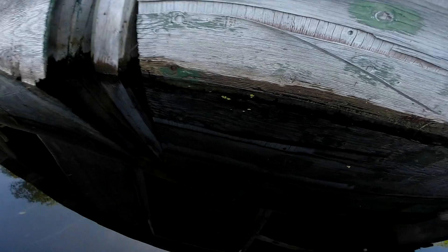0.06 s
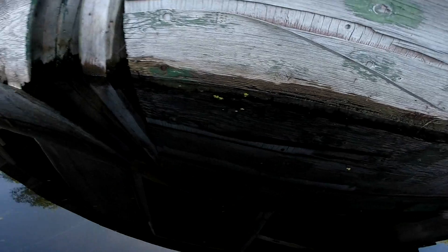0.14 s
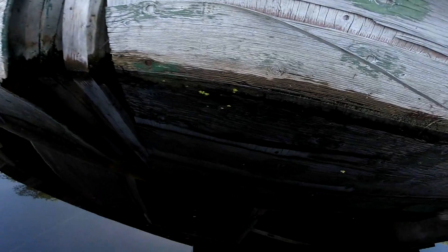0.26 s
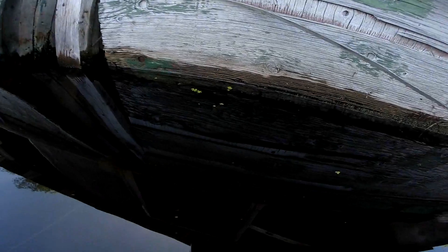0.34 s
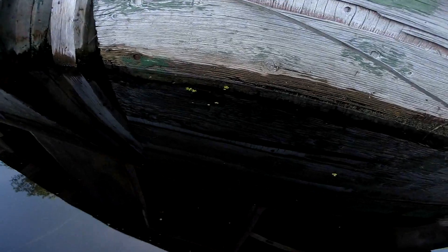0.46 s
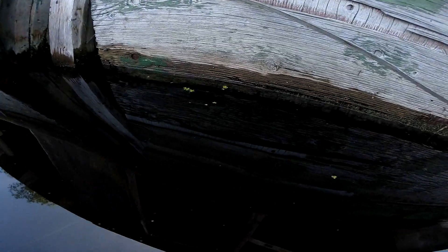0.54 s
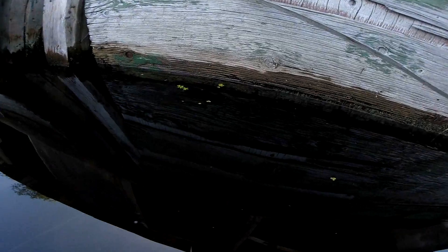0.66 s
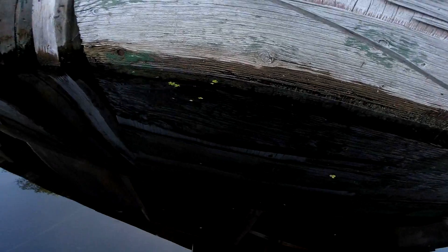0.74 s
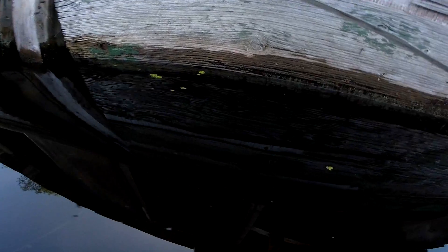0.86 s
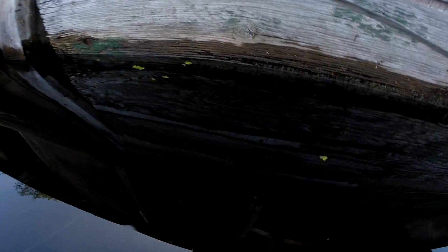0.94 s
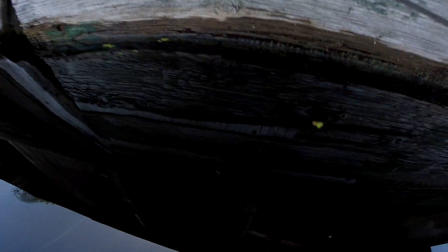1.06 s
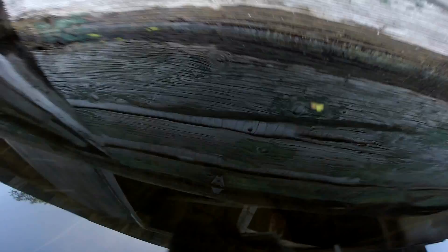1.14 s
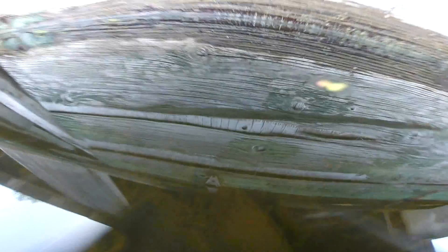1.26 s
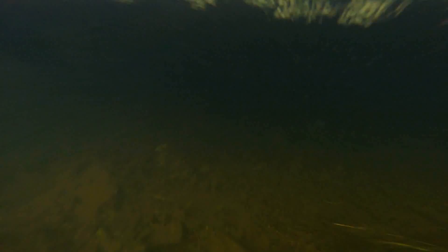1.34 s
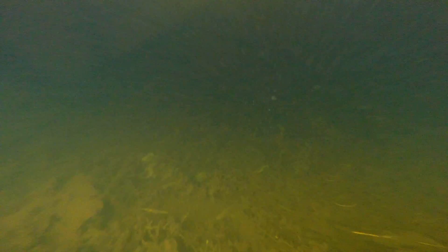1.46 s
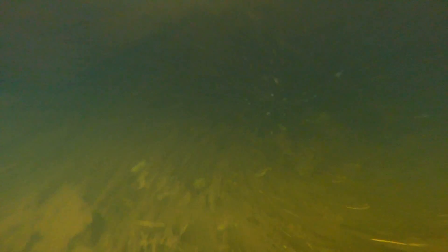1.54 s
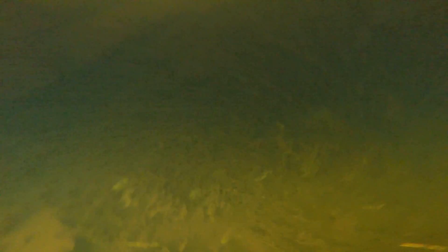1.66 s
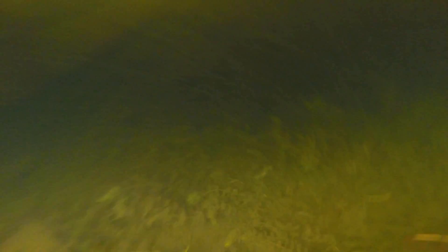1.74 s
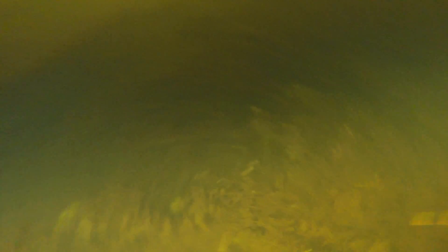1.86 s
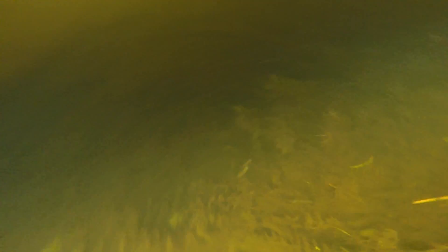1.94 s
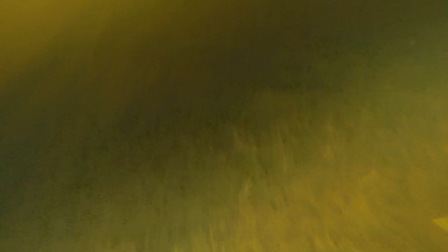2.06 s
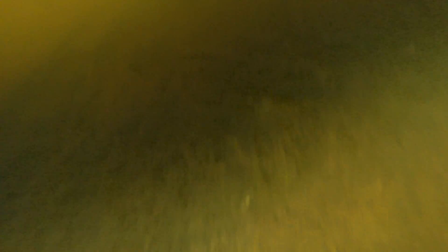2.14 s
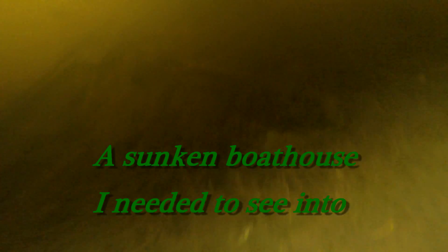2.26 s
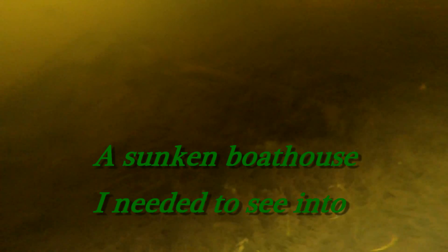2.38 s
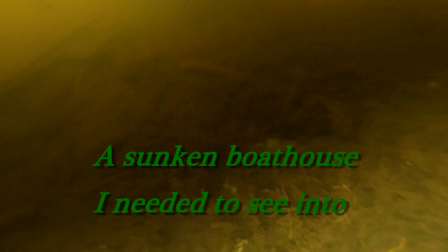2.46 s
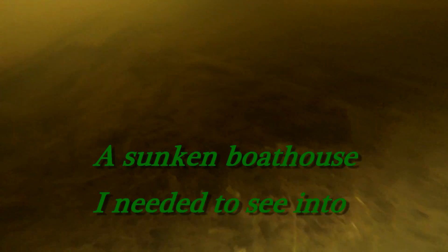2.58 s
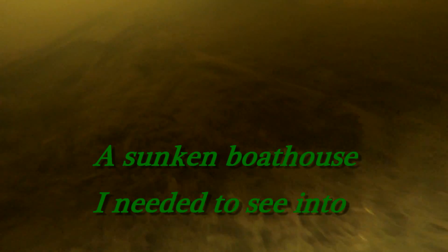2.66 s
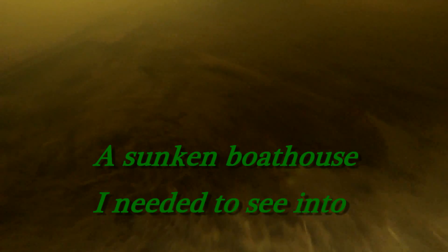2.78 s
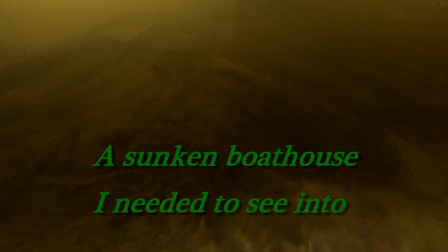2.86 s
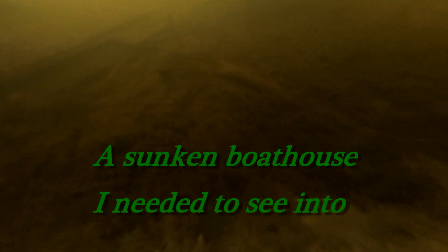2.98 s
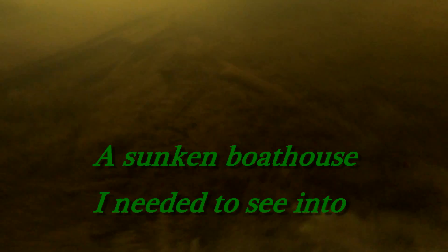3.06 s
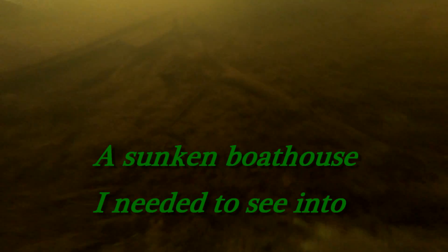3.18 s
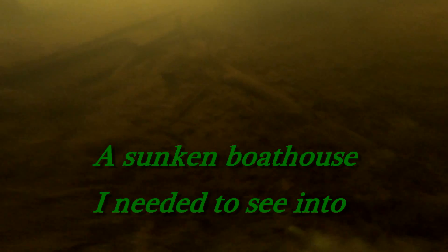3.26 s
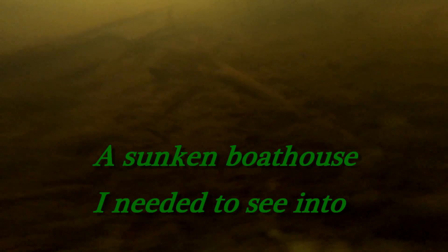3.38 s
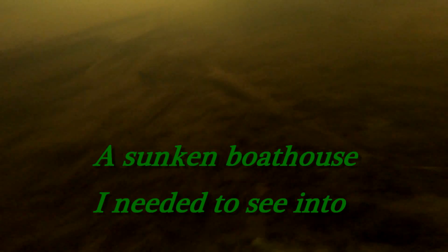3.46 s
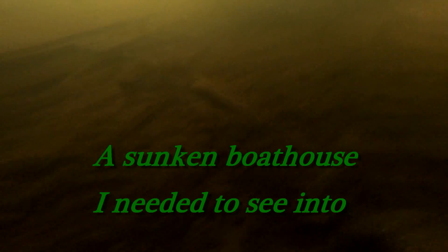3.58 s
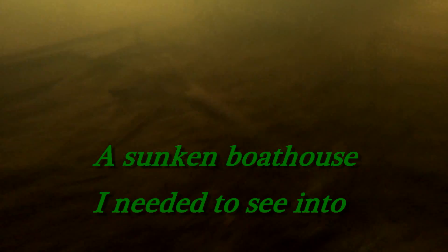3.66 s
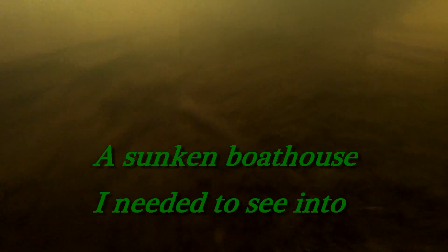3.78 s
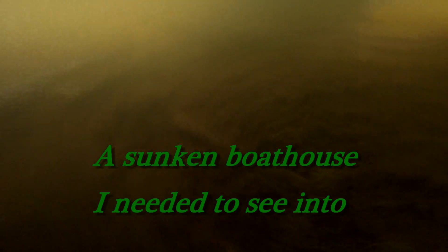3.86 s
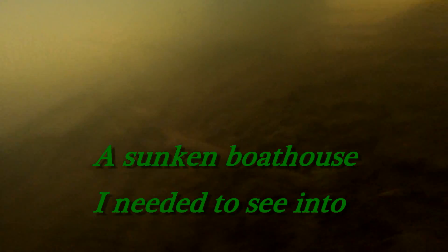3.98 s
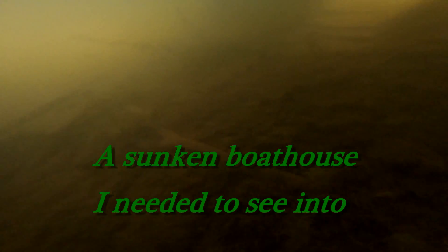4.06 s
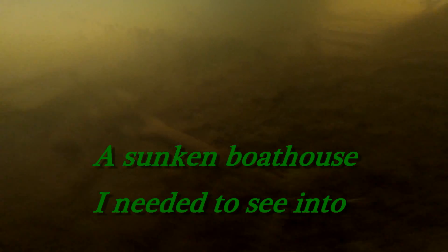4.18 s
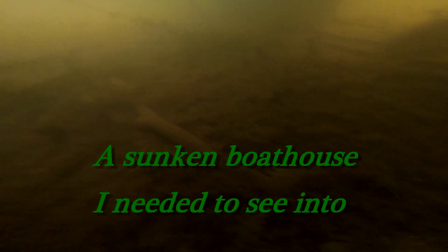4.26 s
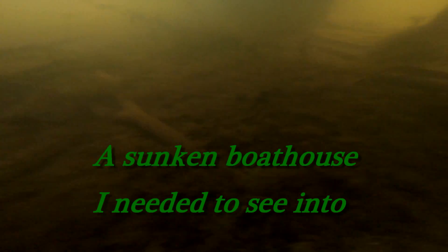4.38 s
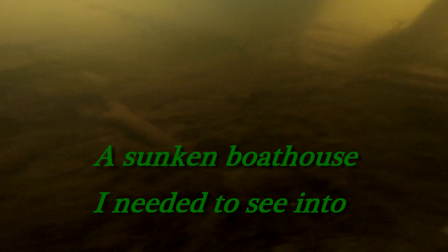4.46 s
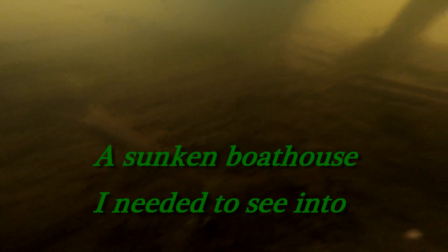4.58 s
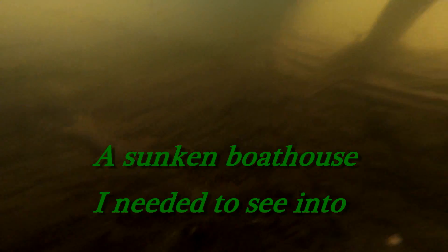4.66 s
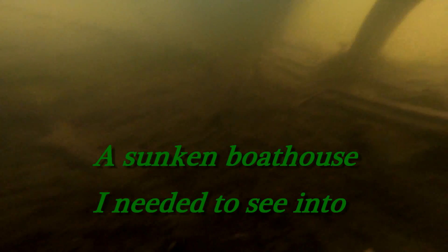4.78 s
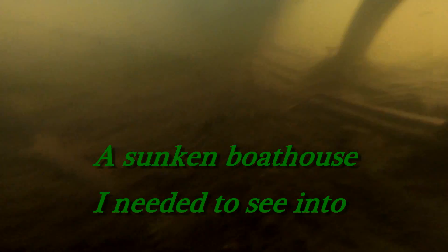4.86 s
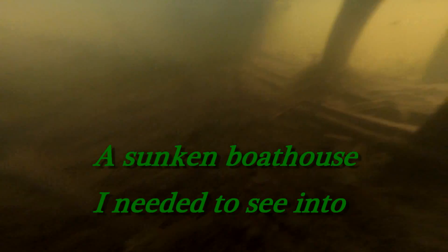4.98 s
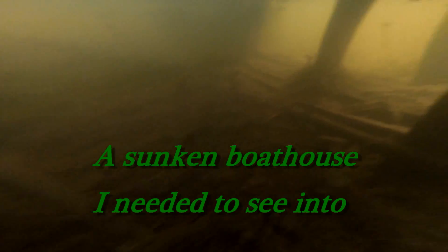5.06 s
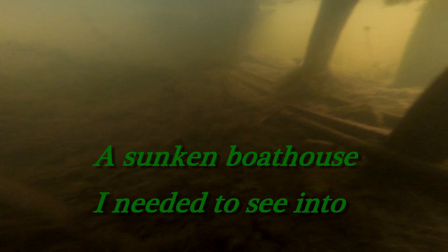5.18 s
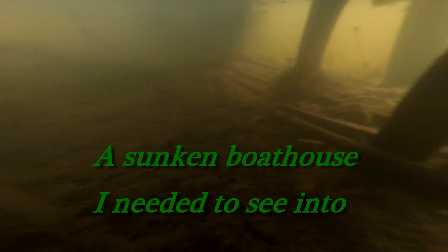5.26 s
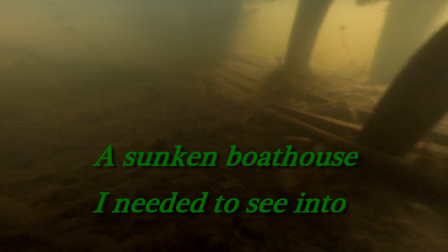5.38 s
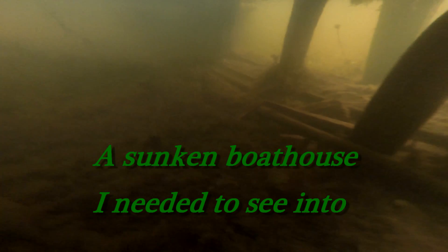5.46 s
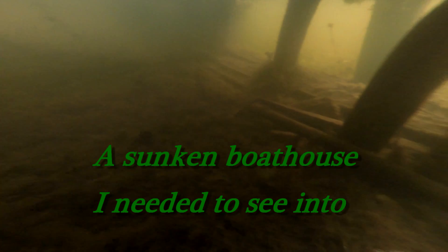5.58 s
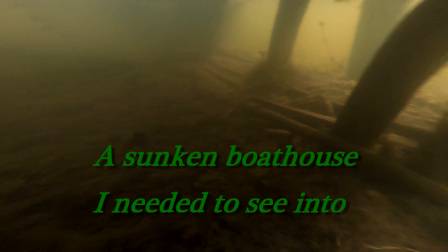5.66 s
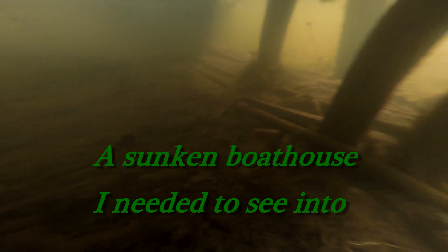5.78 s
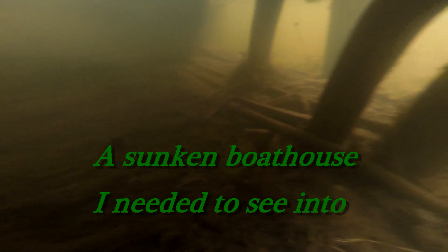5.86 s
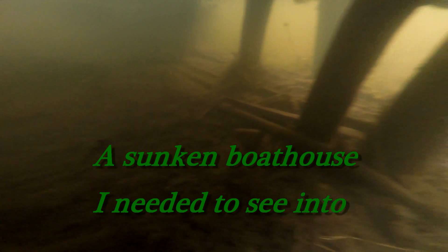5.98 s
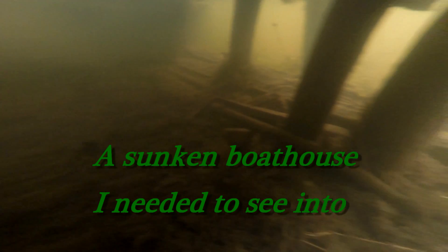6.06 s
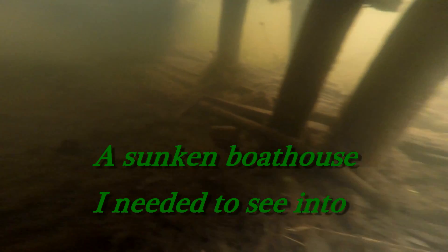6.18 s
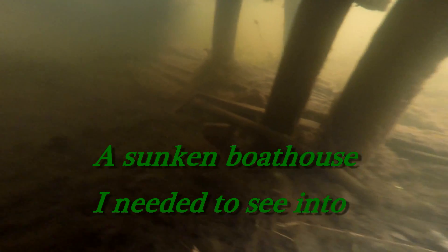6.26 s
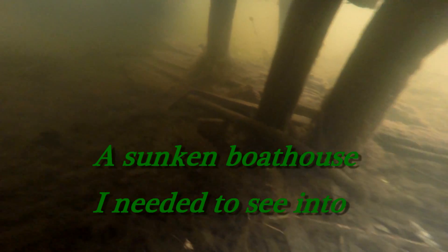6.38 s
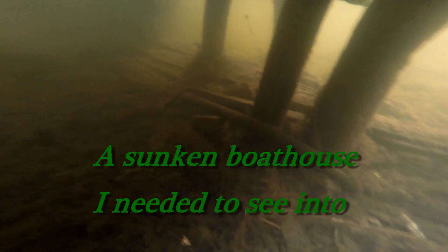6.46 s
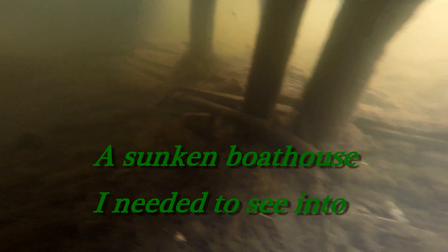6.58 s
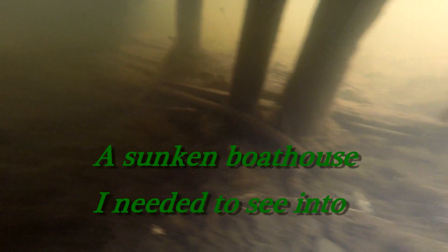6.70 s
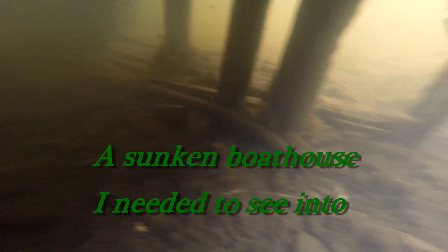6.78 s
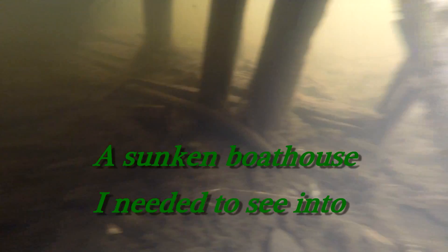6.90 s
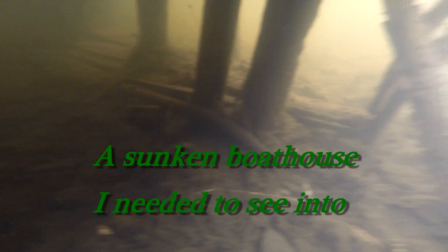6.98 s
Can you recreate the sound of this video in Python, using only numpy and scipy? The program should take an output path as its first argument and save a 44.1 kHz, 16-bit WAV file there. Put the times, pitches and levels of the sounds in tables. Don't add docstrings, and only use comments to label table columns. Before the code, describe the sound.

The microphone is inside a small sealed camera housing on a pole beside a boat. At 0 s there is a dull low knock, then only quiet rumble and faint hiss until about 1.4 s. At 1.45 s the housing smacks into the river: a loud, near-clipping blow, sharp slaps, spray, bright droplet ticks and dense popping bubbles, with another burst near 1.7 s. Air escapes in hollow, rising gurgles to 1.9 s, thinning to scattered blips by 2.5 s. From about 2 s an idling engine emerges through the water, a dry metallic rattle pulsing about twelve times a second with a thin high squeal. Heavy boomy thumps strike at 2.7, 3.0 (hardest, briefly ducking the background) and 3.7-4.1 s, with rubbing, creaks and a few bubbles. After 4.6 s the ticking and soft rumble continue steadily, with faint bumps and a small click around 6.4-6.6 s, until 7 s.

```python
import sys
import numpy as np
from scipy import signal
from scipy.fft import rfft, irfft
from scipy.io import wavfile

SR = 44100
rng = np.random.default_rng(int(sys.argv[2]) if len(sys.argv) > 2 else 0)


def volts_from_db(level):
    exponent = np.asarray(level, float) / 20
    return 10 ** exponent


def master_out(mix):
    frames = np.transpose(np.atleast_2d(mix))
    ceiling = np.clip(frames, -1, 1)
    pcm = np.round(ceiling * 32767).astype(np.int16)
    wavfile.write(sys.argv[1], SR, pcm)


N = 310155


def rms_one(x):
    return x / np.sqrt(np.mean(x ** 2) + 1e-20)


def in_time(rows, outside=None):
    s, *columns = np.transpose(rows)
    return [np.interp(np.arange(N) / SR, s, c, outside, outside) for c in columns]


def butter(x, hz, kind, order=2):
    return signal.sosfilt(signal.butter(order, hz, kind, fs=SR, output="sos"), x)


def drift(rate_hz):
    return rms_one(butter(rng.standard_normal(N + SR), rate_hz, "low")[SR:])


def resonate(x, modes):
    out = 0
    for k, (hz, width_hz, db) in enumerate(modes):
        r = np.exp(-np.pi * width_hz / SR)
        zeros = np.array([1, 0, -1]) * (1 - r * r) / 2
        poles = [1, -2 * r * np.cos(2 * np.pi * hz / SR), r * r]
        out = out + (-1) ** k * volts_from_db(db) * signal.lfilter(zeros, poles, x)
    return out


def add(out, s, sound):
    at = round(s * SR)
    out[at:at + len(sound)] += sound[:max(N - at, 0)]


def swell(s, hold_s, attack_s, release_s):
    t = np.arange(N) / SR - s
    return np.exp(np.minimum(t, 0) / attack_s - np.maximum(t - hold_s, 0) / release_s)


def motion():
    # time in seconds, level in dB.
    sway = [(0, -46.5), (1.4, -48), (2.0, -45.5), (2.6, -34.5), (3.2, -53), (3.6, -40), (4.5, -34),
            (5.3, -42.5), (5.6, -38), (6.0, -40), (6.56, -37.5), (7.03, -39.5)]
    # start in seconds, hold in seconds, rumble in dB, rubbing in dB re rumble.
    jerk_rows = [(0, 0.0043, -27.5, -18.5), (1.233, 0.11, -51, -34), (1.456, 0.026, -29, -4),
                 (1.643, 0.17, -34.5, -2.5), (2.097, 0.12, -61.5, -2), (2.275, 0.14, -36.5, -15),
                 (2.615, 0.017, -56, 3), (2.725, 0.13, -25, -22.5), (3.053, 0.067, -33.5, -17),
                 (3.347, 0.024, -31.5, -17.5), (3.589, 0.016, -56, 7), (3.729, 0.047, -34.5, 1.5),
                 (3.845, 0.22, -38, -3), (4.044, 0.17, -37.5, -21), (4.181, 0.12, -39.5, -6.5),
                 (4.327, 0.066, -46, -6), (4.503, 0.026, -51.5, 0.5), (4.604, 0.06, -54, -10)]
    # resonance in Hz, width in Hz, level in dB.
    creak = [(299, 60, 5.5), (205, 50, -5), (558, 444, 1), (741, 260, 5.5), (970, 460, -3.5)]
    calm_shake_db, shake_follows_sway, jerk_shake_db, calm_rub_db = -50.5, 0.85, -5, -55
    sway_db, = in_time(sway)
    jerks = [(db, rub_db, swell(s, hold_s, attack_s=0.015, release_s=0.035))
             for s, hold_s, db, rub_db in jerk_rows]
    jerked = sum(volts_from_db(db) * shape for db, _, shape in jerks)
    rubbed = volts_from_db(calm_rub_db) * gain() + sum(volts_from_db(db + rub_db) * shape for db, rub_db, shape in jerks)
    calm_shake = volts_from_db(calm_shake_db + shake_follows_sway * (sway_db - sway_db.mean()))
    shaken = calm_shake + volts_from_db(jerk_shake_db) * jerked

    rumble = butter(rng.standard_normal(N), 56.2, "low", order=3)
    rumble = rms_one(butter(rumble, 3.3, "high"))
    shake = resonate(rng.standard_normal(N), [(91.03, 4, 11.5), (117.8, 62, -9.0)])
    shake = rms_one(butter(shake, 170, "low", order=4))
    rub = rms_one(butter(resonate(rng.standard_normal(N), creak), 1100, "low"))
    rub = rub * volts_from_db(2.5 * drift(25))
    lumps = volts_from_db(2 + drift(2.6))
    return (sway_db_to_level := volts_from_db(sway_db) + jerked) * lumps * rumble + shaken * shake + volts_from_db(-4.5) * rubbed * rub


def hiss():
    # frequency in Hz, level in dB per Hz.
    spectrum = [(76, 2.5), (130, 3.5), (152, -4), (222, -5.5), (266, -21), (299, -10), (704, -19),
                (1250, -19.5), (1440, -13), (2300, -21), (3000, -21.5), (4200, -27), (16200, -62.5)]
    level_db = -50.5
    hz, db = np.transpose(spectrum)
    bin_hz = np.arange(N // 2 + 1) * SR / N
    shape = np.interp(np.log(bin_hz + 1), np.log(hz), volts_from_db(db), 0, 0)
    return volts_from_db(level_db) * rms_one(irfft(rfft(rng.standard_normal(N)) * shape, N))


def knocks():
    # start in seconds, swing in dB, pitch in Hz (negative if pulled outward first), t60 in seconds,
    # click in dB re swing.
    blows = [(0.043, -13, 98.5, 0.15, -29), (1.454, -4.5, 117, 0.14, -25), (1.4564, 2.5, -130, 0.045, -27),
             (1.484, -17, 197, 0.074, -40), (1.599, -24.5, 154, 0.075, -40), (1.788, -21, 229, 0.046, -38),
             (2.415, -24.5, 162, 0.062, -40), (4.129, -31, 148, 0.14, -25), (4.22, -22.5, 89, 0.16, -25),
             (1.711, -6, 85.5, 0.078, -35), (2.362, -21.5, 94, 0.18, -29), (2.7205, 0, -65, 0.036, -46),
             (2.7374, -7, 82, 0.031, -52), (2.7491, -3.5, 98, 0.089, -48), (2.824, -8.5, 82, 0.14, -47),
             (2.846, -17.5, 90, 0.26, -27), (3.0029, -22, 102.5, 0.014, 17), (3.0043, 10, 125, 0.03, -40),
             (3.008, 8, -70, 0.021, -45), (3.023, -17.5, 95, 0.39, -27), (3.047, -6, 96.5, 0.059, -41),
             (3.131, -29.5, 146, 0.19, -42), (3.351, -12, 60, 0.1, -25), (3.388, -19.5, 72.5, 0.14, -40),
             (3.7389, -14, 94.5, 0.18, -13), (3.776, -10.5, 86.5, 0.11, -25), (3.964, -21.5, 80, .02, 12.5),
             (3.967, 4, -74, 0.051, -29), (3.985, -3.5, 90.5, 0.071, -17), (3.998, -15, 100.5, 0.45, -10),
             (4.052, -8.5, 81.5, 0.13, -30), (4.075, -10.5, 87, 0.16, -38), (.035, -18, 48, .15, -50),
             (6.4, -23, 62, .07, -40), (6.64, -28, 70, .15, -40)]
    out, t = np.zeros(N), np.arange(SR // 3) / SR
    swing_rise_s = 0.0034
    thud = 1.4 * np.cos(2 * np.pi * 200 * t) * (1 - np.exp(-t / 0.0051)) * np.exp(-t / 0.0044)
    click = -np.sin(2 * np.pi * 450 * t) * np.exp(-t / 0.00096)
    for s, db, hz, t60_s, click_db in blows:
        swing = -np.sin(2 * np.pi * hz * t) * 0.97 * (1 - np.exp(-t / swing_rise_s)) * volts_from_db(-60 * t / t60_s)
        shudder = 0.3 * butter(rng.standard_normal(len(t)), 2500, "low", order=3) * np.exp(-t / 0.0045)
        add(out, s, volts_from_db(db) * (swing + volts_from_db(click_db) * (thud + click + shudder)))
    return out


def bubbles(rows):
    out, t = np.zeros(N), np.arange(SR // 8) / SR
    snap_shape = (1 - np.exp(-t / 0.00024)) * (np.exp(-t / 0.00044) + 0.15 * np.exp(-t / 0.0045))
    for s, db, hz, t60_s, rise_share, snap_db in rows:
        waver = rms_one(butter(rng.standard_normal(len(t)), hz / 6, "low"))
        waver_rad = min(hz / 2500, 0.45) * waver
        phase = 2 * np.pi * hz * (t + rise_share * t ** 2 / t60_s) + waver_rad
        ring = -np.sin(phase) * (1 - np.exp(-t * hz * 2)) * volts_from_db(-60 * t / t60_s)
        torn = butter(rng.standard_normal(len(t)), [.55 * hz, min(1.9 * hz, 15000)], "band")
        add(out, s, volts_from_db(db) * (ring + volts_from_db(snap_db) * rms_one(torn) * snap_shape))
    return out


def swarms(rise_share, snap_db):
    # from in seconds, to in seconds, bubble count, lowest pitch in Hz, highest pitch in Hz.
    spans = [
        (1.49, 1.76, 26, 800, 3400),
        (1.76, 1.92, 30, 600, 3200),
        (2.26, 2.45, 8, 450, 950),
    ]
    levels_db = [-19.5, -36, -39]
    ring_cycles = 18
    rows = []
    for (start, end, count, low_hz, high_hz), db in zip(spans, levels_db):
        for when, pitch, size in rng.random((count, 3)):
            hz = low_hz * (high_hz / low_hz) ** pitch
            bubble_db = db - 2 * (4 * size - 2)
            rows.append((start + when * (end - start), bubble_db, hz, ring_cycles / hz, rise_share, snap_db))
    return rows


def spray():
    # time in seconds, peak in dB.
    sheets = [(1.456, -21), (1.485, -37.5), (1.52, -40.5), (1.575, -35), (1.624, -29.5), (1.66, -39.5),
              (1.712, -22.5), (1.797, -31.5), (1.835, -46.5), (1.888, -49.5)]
    drops_per_s = 1500 * volts_from_db(5 * drift(60))
    born = rng.random(N) < drops_per_s / SR
    sizes = volts_from_db(4 * np.minimum(rng.exponential(1, N), 4)) * born
    pitch_class = rng.integers(0, 14, N)
    drops = 0
    for k, hz in enumerate(np.geomspace(900, 9000, 14)):
        struck = sizes * (pitch_class == k) + 1e-18
        drops = drops + resonate(resonate(struck, [(hz, hz / 5, 0)]), [(hz, hz / 5, -2.2 * k)])
    level = sum(volts_from_db(db) * swell(s, 0, attack_s=0.003, release_s=0.016) for s, db in sheets)
    return level * rms_one(drops)


def water():
    # start in seconds, peak in dB, pitch in Hz, t60 in seconds.
    gurgles = [(1.482, 0, 766, 0.016), (1.609, -3.5, 675, 0.041), (1.714, 4.5, 394.5, 0.011),
               (1.763, -11, 720, 0.02), (1.791, -4, 768, 0.036), (1.798, -8, 720, 0.05),
               (1.816, -21, 700, 0.032), (1.865, -8, 791, 0.051), (1.872, -18, 734, 0.058),
               (1.898, -17.5, 600, 0.031), (2.079, -1.5, 643, 0.0079), (2.096, -25, 850, 0.054),
               (2.149, -7, 640, 0.008), (2.155, -29, 824, 0.035), (2.196, -29.5, 348, 0.024),
               (2.258, -30, 398, 0.027), (2.269, -13.5, 444, 0.022), (2.278, -21, 487, .02),
               (2.287, -12.5, 485, 0.015), (2.184, -35, 420, .02), (2.237, -37, 477, .02),
               (2.828, -30.5, 694, 0.028), (2.856, -36, 700, 0.03), (3.024, -32, 694, 0.027),
               (3.122, -40.5, 698, 0.029), (3.963, -8.5, 657, 0.021), (4.058, -29.5, 700, .04),
               (4.192, -33, 714, 0.044), (3.985, -31, 620, .03), (2.345, -13, 570, 0.021),
               (2.37, -8, 563, 0.0094), (2.387, -30, 680, 0.054), (2.44, -21.5, 700, 0.023),
               (4.004, -12.5, 1210, 0.0067), (4.295, -35, 560, .05), (4.325, -33, 305, .05),
               (4.41, -38, 320, .04), (4.615, -38, 300, .05), (4.515, -36, 380, .015),
               (3.92, -33, 310, .05), (4.04, -30, 270, .06)]
    # start in seconds, peak in dB, pitch in Hz, t60 in seconds.
    pops = [(1.431, -19, 1560, 0.014), (1.478, -21, 5130, 0.026), (1.483, -14, 6000, 0.011),
            (1.49, -12, 1950, 0.018), (1.517, -18, 1580, 0.044), (1.54, -18, 1500, 0.039),
            (1.565, 3, 2000, 0.01), (1.568, -12.5, 1810, 0.074), (1.583, -8, 1600, 0.011),
            (1.592, -4.5, 2920, 0.017), (1.611, -16.5, 1610, 0.059), (1.622, 4.5, 6200, 0.0028),
            (1.678, -12.5, 1836, 0.076), (1.774, -14, 5460, 0.0085), (1.798, -11.5, 8460, 0.0046),
            (1.801, -6.5, 2590, 0.016), (1.818, -13.5, 1750, 0.018), (1.828, -21, 1970, 0.086),
            (1.92, -18, 2200, 0.029), (2.44, -3, 7960, 0.0053), (2.492, -16.5, 2070, 0.022),
            (3.965, -26.5, 1740, 0.0097), (4.195, -20.5, 2370, 0.012), (1.764, -27, 1900, 0.033),
            (1.792, -13, 1430, 0.042), (1.836, -16.5, 2050, 0.044), (1.867, -22, 1476, 0.039),
            (1.92, -22.5, 1431, 0.018), (1.644, -17.5, 4550, 0.015), (1.718, -20, 4230, 0.029),
            (1.421, -36, 2500, .02), (1.629, -20.5, 1880, 0.04), (1.454, -5.5, 2160, 0.0097)]
    # start in seconds, peak in dB, pitch in Hz, t60 in seconds,
    # pitch rise as a share.
    pocket = [(1.453, -12.5, 315, 0.031, 0.014), (1.571, -8, 1220, 0.017, 0.046),
              (1.775, -18, 445, 0.063, 0.066), (1.684, -15, 740, 0.02, 0.089),
              (1.726, -33, 456, 0.53, .022), (1.789, -12, 403, 0.096, 0.23), (1.838, -24, 748, 0.25, 0),
              (1.864, -14.5, 460, 0.12, 0.174), (1.865, -5.5, 607, 0.039, 0.098),
              (1.9, -28.5, 800, 0.12, 0.054), (2.021, -40, 717, 0.24, .17)]
    # start in seconds, peak in dB, pitch in Hz, snap in dB re ring.
    slaps = [(1.44, -2.5, 2940, -4), (1.454, -3, 10400, -4.5), (1.456, -3.5, 5500, 3.5),
             (1.486, -12.5, 1500, -3), (1.507, -33, 6800, -0.5), (1.583, -18, 3680, -1),
             (1.61, -34, 8800, 3), (1.655, -34, 6500, 6), (1.743, -46.5, 7000, 3),
             (1.762, -40.5, 7000, -3.5), (1.771, -50, 8000, -9), (1.8, -29.5, 6000, 1),
             (1.661, -12, 1510, 2), (1.685, -4.5, 2970, -11), (1.709, -8, 2650, -6.5),
             (1.706, -8, 10500, 0.5), (1.7121, -9.5, 9200, 6.5), (1.73, -31, 4800, -6),
             (1.718, -5, 1920, -2), (1.754, -35, 5660, -2), (1.808, -32, 7600, -5),
             (1.844, -15.5, 2000, -27), (2.243, -42, 1900, 13.5), (2.317, -35, 1810, 13),
             (2.411, -30, 1900, 1), (2.302, -47, 7500, 8), (2.078, -33, 3500, 11), (2.134, -46, 7000, 8),
             (1.882, -46, 5600, -6), (1.898, -49, 6400, 3), (1.774, -18.5, 2300, 5.5),
             (3.622, -56, 7000, 18), (4.61, -43, 7900, -5), (6.487, -24.5, 2800, 3), (6.489, -29, 5750, 4),
             (2.149, -42, 4000, 10), (2.441, -24, 4600, -8), (2.77, -42, 8500, 0), (2.925, -33, 3300, -8),
             (3.008, -44, 5500, 10), (6.575, -40, 6700, 3), (6.879, -34, 3000, 0), (2.32, -40, 6000, 8)]
    rise_share, gurgle_snap_db, pop_snap_db, pocket_snap_db = 0.038, -16, -29.5, -45.5
    slap_t60_s, slap_t60_power = 0.0084, 0.34
    rows = [(*row, rise_share, gurgle_snap_db) for row in gurgles]
    rows += [(*row, pocket_snap_db) for row in pocket]
    rows += [(*row, rise_share, pop_snap_db) for row in pops]
    for s, db, hz, snap_db in slaps:
        t60_s = slap_t60_s * (hz / 1000) ** slap_t60_power
        rows.append((s, db, hz, t60_s, rise_share, snap_db))
    rows += swarms(0.12, pop_snap_db)
    return butter(bubbles(rows) + spray(), 6740, "low", order=2)


def ticks():
    # start in seconds, peak in dB.
    droplets = [(1.437, -50.5), (1.4403, -47), (1.4451, -29), (1.453, -21), (1.4518, -8.5), (1.46, -17),
                (1.4786, -44), (1.482, -39), (1.486, -38), (1.4896, -46), (1.5064, -36), (1.5463, -42),
                (1.5504, -59.5), (1.56, -29), (1.5664, -37.5), (1.5825, -45), (1.5913, -39), (1.6094, -47),
                (1.6206, -20), (1.6444, -56), (1.6544, -53.5), (1.661, -24), (1.6845, -38), (1.7047, -45),
                (1.7086, -28), (1.7133, -11), (1.7165, -36), (1.7194, -41.5), (1.7289, -50), (1.7536, -45),
                (1.7635, -64), (1.7743, -46.8), (1.7995, -38), (1.9206, -52), (2.079, -53), (2.1333, -58),
                (2.319, -55), (2.4416, -41)]
    decay_s, tail_s, tail_db = 0.00092, 0.0013, -32
    out, t = np.zeros(N), np.arange(SR // 30) / SR
    crack = (1 - np.exp(-t / 0.00086)) * (np.exp(-t / decay_s) + volts_from_db(tail_db) * np.exp(-t / tail_s))
    for s, db in droplets:
        add(out, s, volts_from_db(db + 1.5) * crack)
    noise = butter(rng.standard_normal(N), [6400, 15600], "band")
    return out * rms_one(butter(noise, 9000, "low", order=1))


def contacts():
    # share of cycle 0-1, dull in dB, bright in dB, decay in seconds, strike in dB.
    cycle = [
        (0, -9, 1, 0.0038, 0),
        (.31, -8, -8.5, 0.005, -9),
        (.505, -11, -7, .004, -3),
        (.7, -10, -7, .0037, -10),
        (.81, -8, -5, 0.0037, -9),
    ]
    # firing time in seconds, firing in dB, valve half a turn later in dB. At 2.316 s a pop # stands
    firings = [(2.1591, 1.7, 1.9), (2.2406, 4.5, 1.3), (2.316, 8.8, 5.5), (2.4055, 2.5, -1.4),
               (2.4904, 12.7, 0.0), (2.5718, 0.6, -0.8), (2.6561, 7.0, 5.0), (2.7387, 4.3, 7.6),
               (2.8223, 5.0, 3.4), (2.9043, 5.0, 0.4), (2.9868, 5.4, -13.3), (3.0698, -14.4, -8.8),
               (3.1486, 2.0, -0.4), (3.2287, 4.9, 3.7), (3.3097, -1.9, 2.2), (3.3937, 7.2, 3.5),
               (3.4755, 4.1, 6.8), (3.5582, 5.0, 3.7), (3.6411, 1.7, 4.4), (3.7238, 4.7, 5.4),
               (3.8065, 0.7, 1.9), (3.8853, 1.1, 1.3), (3.9678, 5.6, 6.8), (4.0482, -0.3, 1.5),
               (4.1292, 4.0, 1.6), (4.2114, 5.8, 4.0), (4.2926, 2.8, 3.1), (4.376, -1.5, 3.2),
               (4.459, 3.9, 2.4), (4.5411, 0.9, 5.0), (4.6251, 4.0, 2.8), (4.7102, 3.8, 3.3),
               (4.7956, 3.8, 2.3), (4.881, 4.3, 3.8), (4.9643, 3.1, 1.7), (5.047, -1.0, -0.9),
               (5.1283, 3.0, 1.8), (5.2095, 4.7, 4.5), (5.2902, 5.1, -0.7), (5.3685, 3.7, -0.2),
               (5.4496, 4.1, 2.1), (5.5283, 5.8, 5.2), (5.608, -0.3, 0.9), (5.693, 5.6, 5.7),
               (5.7757, 3.9, 5.6), (5.8584, 2.3, 3.7), (5.9399, 5.5, 2.1), (6.0233, 6.2, 0.9),
               (6.1092, 3.5, 5.3), (6.1924, 4.9, 5.3), (6.277, -2.1, 4.0), (6.3614, 0.1, 5.5),
               (6.4467, 5.7, 8.6), (6.5312, 3.9, -2.7), (6.6161, 4.8, 2.8), (6.6974, 6.9, 6.2),
               (6.7749, -2.3, 5.7), (6.8522, 5.7, 3.1), (6.9313, 3.5, 1.8), (7.0086, 8.1, 4.9)]
    cycle_s = .084
    early = [(firings[0][0] - k * cycle_s, 0, 0) for k in (5, 4, 3, 2, 1)]
    s, fire_db, valve_db = np.transpose(early + list(firings))
    fire_db, valve_db = np.clip([fire_db, valve_db], -6, 8)
    marks = np.append(s, s[-1] + cycle_s)
    strikes = np.full((2, N), 1e-18)
    dull, bright = np.full(N, .12), np.full(N, .15)
    t, even = np.arange(SR // 20) / SR, 0 * s
    forces_db = [fire_db, even, valve_db, even, even]
    for (share, dull_db, bright_db, decay_s, strike_db), force_db in zip(cycle, forces_db):
        late, sharp = rng.standard_normal((len(s), 2)).T
        starts = np.interp(np.arange(len(s)) + share, np.arange(len(marks)), marks) + .002 * share * late
        burst = (1 - np.exp(-t / 0.001)) * np.exp(-t / decay_s)
        rows = 1 if share > 0 else 2
        for start, db, edge in zip(starts, force_db, sharp):
            add(dull, start, volts_from_db(dull_db + db) * burst)
            add(bright, start, volts_from_db(bright_db + db + 1.5 * edge) * burst)
            strikes[:rows, min(round(start * SR), N - 1)] = volts_from_db(db + strike_db + edge * share)
    return marks, dull, bright, strikes


def plates(strikes, sunk):
    # pitch in Hz, width in Hz, level in dB, dB gained with depth, 1 if only the firing reaches it.
    modes = [(1610, 165, 0, 6.5, 0), (1930, 220, -7, 3, 0), (2580, 200, -10, 3, 0), (4150, 500, -11, -1, 1),
             (3700, 400, -27, 20, 1), (5750, 250, -25, 1, 1), (6800, 300, -27, 2, 1),
             (7500, 250, -40, 10, 1)]
    out, unit = 0, signal.unit_impulse(SR // 20)
    for hz, width_hz, db, grows_db, firing in modes:
        mode = [(hz, width_hz, 0)]
        ring = resonate(resonate(strikes[firing], mode), mode)
        peak = np.max(resonate(resonate(unit, mode), mode))
        out = out + volts_from_db(10.5 + grows_db * sunk + db) * ring / peak
    return out


def squeal(marks):
    # pitch in Hz, wander in Hz, wander rate in Hz, level in dB.
    tones = [(5990, 25, 30, 1), (10350, 200, 200, -5)]
    turn = np.interp(np.arange(N) / SR, marks, np.arange(len(marks))) % 1
    rubbing = np.exp(-((turn - .43) / .15) ** 4) * volts_from_db(1.5 * drift(8))
    out = 0
    for hz, wander_hz, rate_hz, db in tones:
        phase = 2 * np.pi * np.cumsum(hz + wander_hz * drift(rate_hz)) / SR
        out = out + volts_from_db(db) * np.sin(phase)
    return rms_one(rubbing * out)


def cancel(hull, sunk):
    # notch in Hz, width in Hz, depth 0-1 near the surface, depth 0-1 when sunk.
    notches = [(1380, 60, 1, .97), (1846, 22, 0.3, .55), (2700, 110, .05, 0.3), (3320, 140, .05, .6),
               (4440, 120, .3, .5), (5130, 250, .2, .35)]
    for hz, width_hz, near, deep in notches:
        depth = np.minimum(near + (deep - near) * sunk, 1)
        hull = hull - depth * resonate(hull, [(hz, width_hz, 0)])
    return hull


def engine():
    # time in seconds, level through the water in dB.
    through_water = [(1.746, -49), (2.074, -44), (2.404, -41.5), (2.739, -38), (3.065, -37.5), (3.393, -41),
                     (3.72, -38.5), (4.047, -37), (4.375, -37), (4.708, -38.5), (5.047, -39.5),
                     (5.37, -40.5), (5.693, -39.5), (6.022, -41), (6.358, -39.5), (6.694, -40.5),
                     (7.009, -41)]
    # pitch in Hz, width in Hz, level in dB.
    dull_modes = [(1260, 57, 5), (1694, 344, 3), (1834, 132, 9), (1900, 187, 4.5), (2530, 230, 1.5),
                  (2813, 158, -2), (3183, 67, -3.5)]
    # pitch in Hz, width in Hz, level in dB.
    bright_modes = [(3350, 490, 5.5), (4150, 490, 9), (4710, 370, 4.5), (5740, 230, -4), (6380, 540, -26.5),
                    (6850, 250, -4.5), (6430, 770, -16), (9400, 1500, -18.5), (13500, 1900, -44)]
    t = np.arange(N) / SR
    marks, dull, bright, strikes = contacts()
    rattle = rng.standard_normal(N)
    water_db = in_time(through_water + [(N / SR, *through_water[-1][1:])], -120)[0]
    shallow = 1 / (1 + np.exp((t - 2.14) / 0.46))
    sunk = 1 / (1 + np.exp((4.4 - t) / .8))
    bright_db = -10.5 + shallow
    squeal_db = -28.5 + 5.6 * shallow
    low = rms_one(butter(resonate(dull * rattle, dull_modes), 860, "high", order=6))
    low = low + resonate(low, [(3220, 250, 4.5)]) * shallow
    low = low + resonate(low, [(1610, 240, 5)]) * sunk
    low = low + plates(strikes, sunk)
    high = rms_one(butter(resonate(bright * rattle, bright_modes), 3600, "high", order=4))
    hull = cancel(low + volts_from_db(bright_db) * high, sunk)
    return volts_from_db(water_db - 2.5) * (hull + volts_from_db(squeal_db) * squeal(marks))


def gain():
    # time in seconds, depth in dB.
    ducks = [
        (1.869, -7),
        (2.996, -23),
    ]
    gain_db, recover_s, lasting_share = -2.5, 0.28, 0.011
    t = np.arange(N) / SR
    for s, db in ducks:
        left = lasting_share + (1 - lasting_share) * np.exp(-np.abs(t - s) / recover_s)
        gain_db = gain_db + db * (t > s) * left
    return volts_from_db(gain_db)


def scene():
    quiet = gain() * (hiss() + engine())
    return (motion() + knocks() + quiet + water() + ticks())[None]


def roll_off(x):
    return signal.sosfilt(signal.butter(12, 16470, fs=SR, output="sos"), x)


def record(dry):
    top = signal.cheby2(10, 60, 16300, fs=SR, output="sos")
    mix = np.clip(signal.sosfilt(top, dry), -1, 1)
    return roll_off(mix)


dry = scene()
out = record(dry)
master_out(out)
```